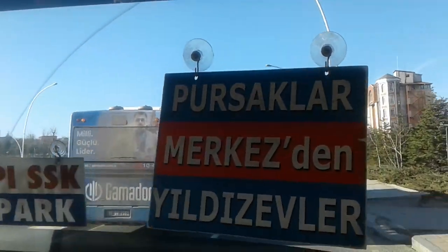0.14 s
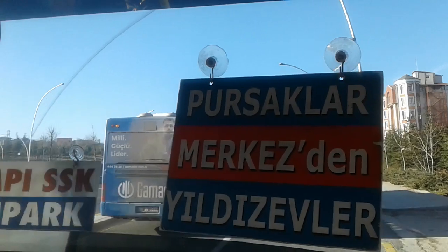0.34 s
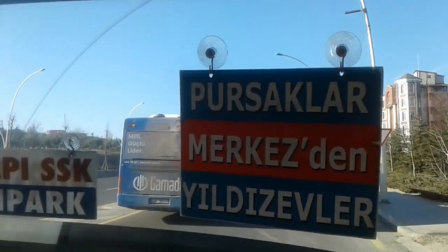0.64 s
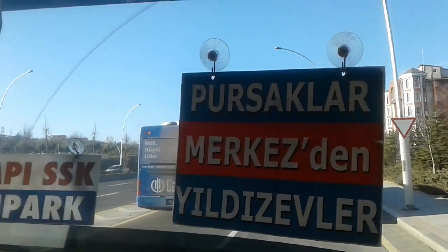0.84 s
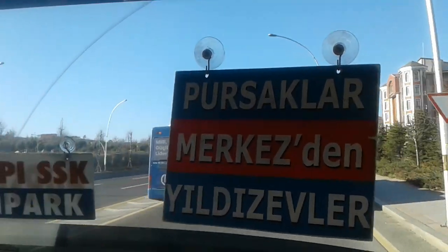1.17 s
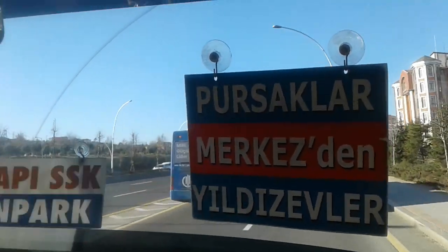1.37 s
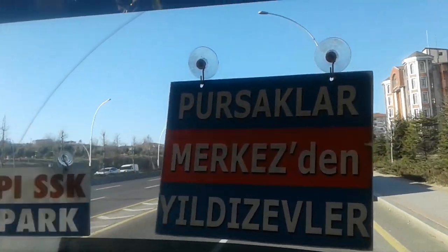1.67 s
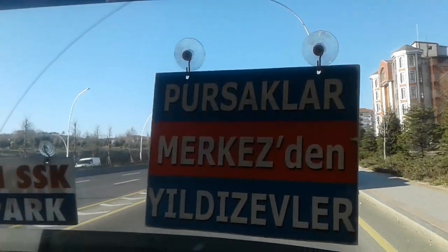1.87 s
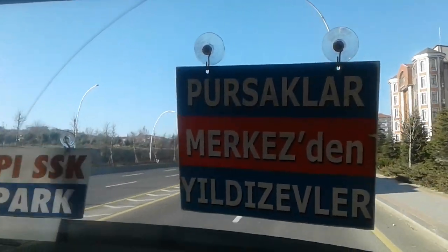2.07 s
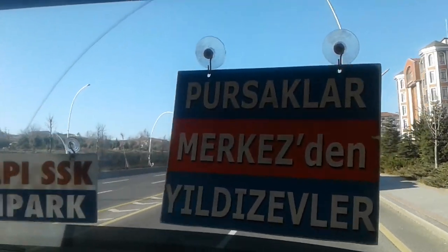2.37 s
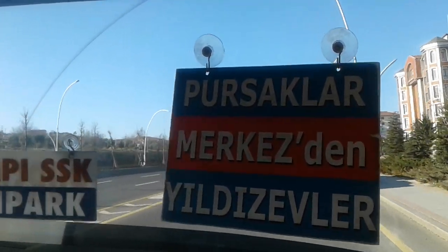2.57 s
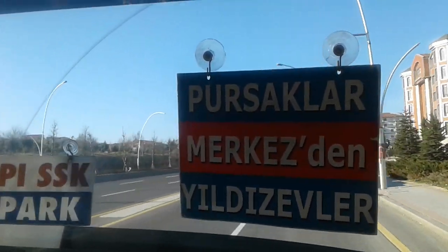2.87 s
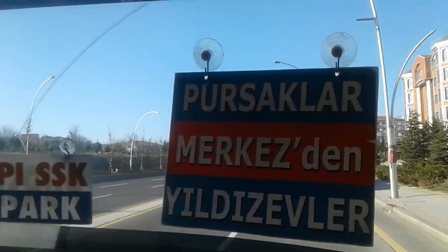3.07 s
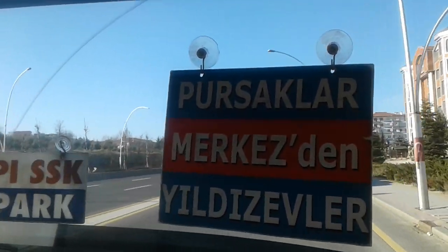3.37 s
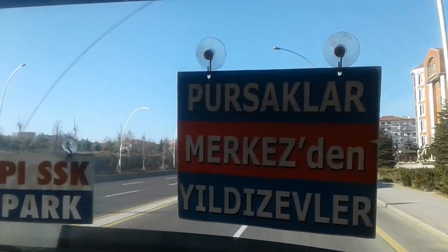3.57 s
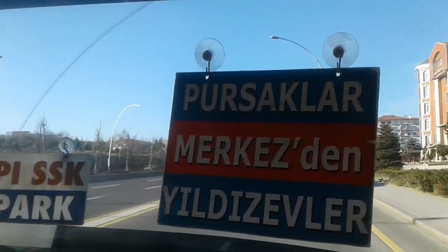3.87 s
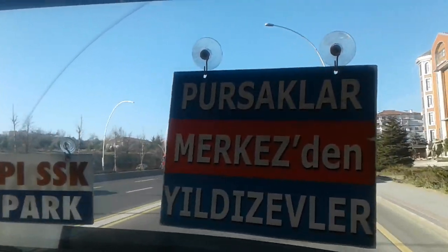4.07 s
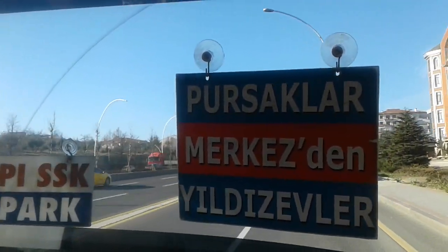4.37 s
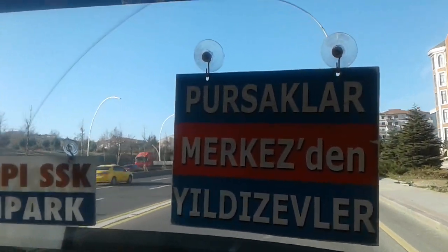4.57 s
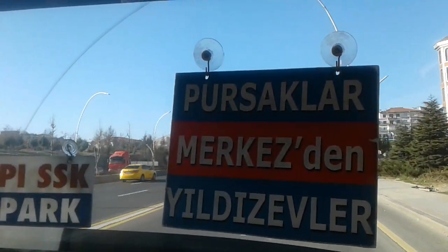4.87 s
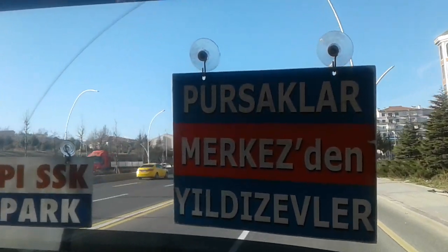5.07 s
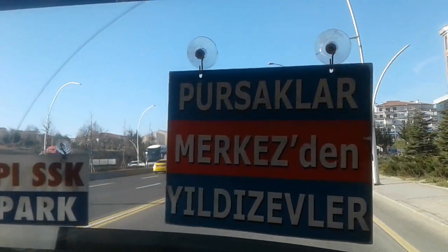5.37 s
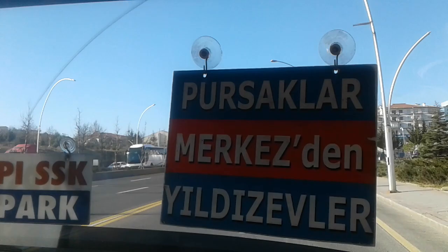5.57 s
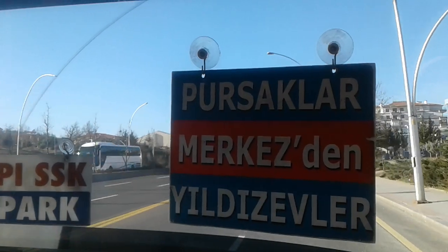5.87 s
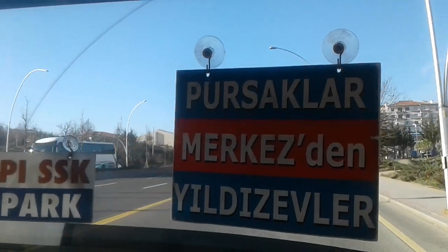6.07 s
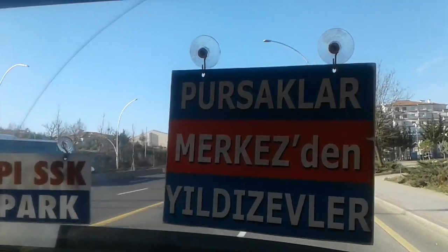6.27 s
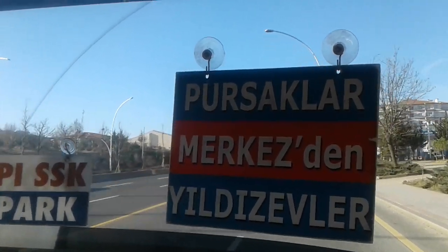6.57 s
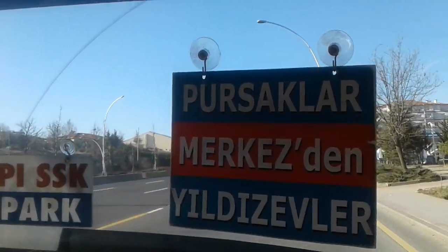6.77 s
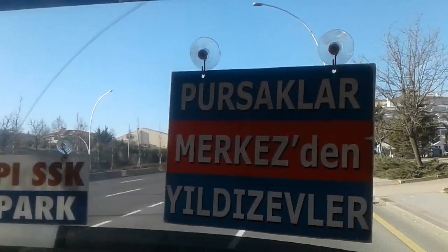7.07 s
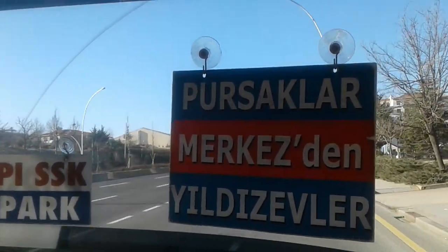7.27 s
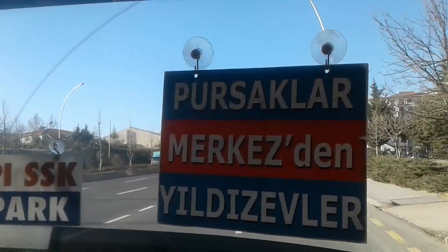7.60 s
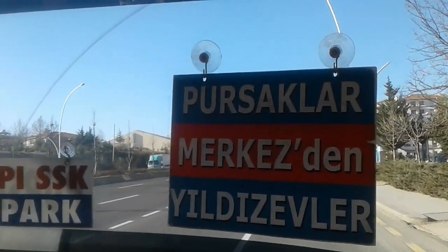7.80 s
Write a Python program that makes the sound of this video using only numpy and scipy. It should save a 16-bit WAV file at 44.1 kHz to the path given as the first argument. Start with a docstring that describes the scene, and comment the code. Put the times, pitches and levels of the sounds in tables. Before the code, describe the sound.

A continuous interior sound of a diesel minibus driving along a city road, about eight seconds. From the start a strong, low, booming hum fills the cab, overlaid by hard, fast, uneven clatter from the engine and a faint mid-high whine. Steady low rumble comes through the floor, with tyre noise and a thin high hiss of air and wind. The pitch creeps up slightly until about 3.6 s, then holds nearly level, and the main boom weakens as it does. Small bright ticks of loose plastic occur near 0.6, 1.2, 1.5, 1.8, 4.3 and 5.5 s; the boom dips very briefly at 1.5 s. Tyre roar swells around 3 s, with smaller bumps at 3.65, 4.4 and 6.5 s. The engine works slightly harder at 2.5 s and from 5.7 to 6.5 s, its clatter and hiss rising, then eases. It is still running at the end.

```python
"""Diesel minibus, inside the cab

A four-cylinder diesel drives along a city road. Cosines at multiples of the firing rate make the cab boom,
less as the engine gathers speed. Its knocks repeat every cycle as a hard clatter (a waveform per cycle)
under fresh noise bursts, with a faint whine. Clatter and a thin air hiss rise with the engine's effort,
over coloured noise for rumble, tyres, rough patches and wind, and noise ticks of loose trim."""
import sys
import numpy as np
from scipy import signal
from scipy.fft import rfft, irfft, next_fast_len
from scipy.io import wavfile
from scipy.ndimage import uniform_filter1d, minimum_filter1d, map_coordinates

SR = 44100
rng = np.random.default_rng(int(sys.argv[2]) if len(sys.argv) > 2 else 0)


def master_out(mix):
    """Clip the mix to full scale and print it as 16-bit PCM to the path in sys.argv[1]."""
    frames = np.transpose(np.atleast_2d(mix))
    ceiling = np.clip(frames, -1, 1)
    pcm = np.round(ceiling * 32767).astype(np.int16)
    wavfile.write(sys.argv[1], SR, pcm)


N = 350154
TIME = np.arange(N) / SR
CYLINDERS = 4
SLOW_HZ, CRUISE_HZ = 69.5, 72.1  # firing rates


def amp(db):
    """Decibels to gain."""
    return 10 ** (np.asarray(db) / 20)


def curve(rows, t=TIME):
    """Table columns, joined by straight lines in time."""
    s, *columns = np.transpose(rows)
    return [np.interp(t, s, column) for column in columns]


def read(points, hz):
    """Spectrum in dB, interpolated on a log-frequency axis."""
    f, db = np.transpose(points)
    return np.interp(np.log(hz + 1), np.log(f), db)


def evened(x):
    """Scale to rms 1."""
    return x / np.sqrt(np.mean(x ** 2) + 1e-20)


def noise(density, gate=1):
    """White noise, gated, then coloured to a density in dB per Hz."""
    size = next_fast_len(N)
    white = gate * rng.standard_normal(N) * np.sqrt(SR / 2)
    gain = amp(read(density, np.fft.rfftfreq(size, 1 / SR)))
    return irfft(rfft(white, size) * gain, size)[:N]


def drift(shape, steps):
    """Slow chance of rms 1 down each column, smoothed by a Gaussian of so many steps."""
    offset = np.arange(shape[0]) - shape[0] // 2
    window = np.exp(-.5 * (offset / steps) ** 2)
    spectrum = rfft(rng.standard_normal(shape), axis=0) * abs(rfft(window))[:, None]
    return evened(irfft(spectrum, shape[0], axis=0))


def waver(count):
    """Smooth chance over the scene, drawn at so many moments."""
    moments = np.linspace(0, TIME[-1], count)
    return np.interp(TIME, moments, drift((count, 1), steps=1)[:, 0])


def hump(s, half_s, db):
    """Smooth rise and fall in dB around one moment."""
    return db * np.exp(-((TIME - s) / half_s) ** 2)


# engine speed before hunting: (t/s, firing rate f/Hz)
FIRING_RATE = [(0.0, 69.23), (0.4, 69.5), (1.4, 70.43), (1.8, 70.16), (2.15, 71.1), (2.45, 70.78),
               (2.7, 71.49), (3.6, 72.09), (4.2, 72.1), (5.45, 72.09), (5.75, 72.48), (6.45, 72.63),
               (7.5, 72.36), (7.94, 72.01)]


def firing_hz(t=TIME):
    """Firing rate, which sets the pitch of every engine order."""
    return curve(FIRING_RATE, t)[0]


def pace(t=TIME):
    """Engine speed from 0 (slow) to 1 (cruising)."""
    return np.clip((firing_hz(t) - SLOW_HZ) / (CRUISE_HZ - SLOW_HZ), 0, 1)


# how hard the engine works; only changes about the mean count: (t/s, level/dB)
EFFORT_LEVEL = [(0, -19), (0.9, -18.5), (1.6, -18.5), (2.5, -17.5), (3.4, -18), (4.1, -18.5), (5.45, -19),
                (5.7, -17), (6.5, -17.5), (7.2, -19), (7.94, -19.5)]


def effort():
    """Engine effort in dB around its mean."""
    db, = curve(EFFORT_LEVEL)
    return db - db.mean()


# body rumble from the road, before rumble_db: (f/Hz, density/dB per Hz)
RUMBLE_DENSITY = [(10, -64.5), (25, -57.5), (40, -56), (62, -54), (94, -42.5), (130, -45.5), (180, -47.5),
                  (255, -44.5), (340, -60), (600, -70.5), (2000, -110), (15000, -140)]


def rumble(rumble_db=0.53):
    """Road vibration through the floor: low coloured noise."""
    return amp(rumble_db) * noise(RUMBLE_DENSITY)


# tyre noise, before level and fade: (f/Hz, density/dB per Hz)
TYRE_DENSITY = [(150, -77), (380, -59.5), (500, -55.5), (680, -60.5), (900, -56.5), (1100, -65.5),
                (2500, -75.5), (5000, -100), (15000, -130)]
# rough road: (centre t/s, half length/s, rise level/dB)
ROUGH_PATCHES = [(2.95, 0.27, 6.5), (3.65, 0.13, 3), (4.388, 0.087, 3.5), (6.49, 0.062, 5)]
TYRE_DB, TYRE_FADE_DB_PER_S = 1, .5  # level at mid-scene


def tyres():
    """Tyre roar: coloured noise, swelling on rough patches and slowly fading."""
    patches_db = sum(hump(*row) for row in ROUGH_PATCHES)
    fade_db = TYRE_FADE_DB_PER_S * (TIME - TIME.mean())
    return amp(TYRE_DB - fade_db + patches_db) * noise(TYRE_DENSITY)


# wind on the body, before level and gusts: (f/Hz, density/dB per Hz)
WIND_DENSITY = [(3500, -78), (4600, -80), (5800, -78), (6700, -79), (7100, -88), (8000, -98), (9100, -98.5),
                (9600, -103), (12500, -99.5), (13500, -103), (14700, -112), (15700, -112)]


def wind(wind_db=0.44, db_per_effort_db=.6, gust_db=0.8):
    """Gusty high noise on the body, rising with effort."""
    db = wind_db + db_per_effort_db * effort() + gust_db * waver(240)
    return amp(db) * noise(WIND_DENSITY)


# loose trim: (t/s, rms level before decay/dB)
TRIM_TICKS = [(0.6464, -47), (1.1777, -37), (1.486, -47), (1.8482, -45), (4.2694, -39), (4.42, -50),
              (4.46, -50), (5.456, -51)]


def trim(decay_s=.0015, count=900):
    """Loose plastic gives short, bright ticks: decaying band noise."""
    out, t = np.zeros(N + count), np.arange(count) / SR
    band = signal.butter(2, [5000, 13000], "bandpass", fs=SR)
    for s, db in TRIM_TICKS:
        tick = evened(signal.lfilter(*band, rng.standard_normal(count))) * np.exp(-t / decay_s)
        out[round(s * SR):][:count] += amp(db) * tick
    return out[:N]


AIR_DB, AIR_HZ = -61.5, 10900  # at mean effort
AIR_DB_PER_EFFORT_DB, AIR_HZ_PER_EFFORT_DB = 2, 260


def air(half_width_hz=520, flutter_db=1):
    """Narrow, fluttering hiss that gets louder and higher as the engine draws more air."""
    push_db = effort()
    band = signal.lfilter(*signal.butter(2, half_width_hz, fs=SR), rng.standard_normal((2, N)))
    angle = 2 * np.pi * np.cumsum(AIR_HZ + AIR_HZ_PER_EFFORT_DB * push_db) / SR
    hiss = evened(band[0] * np.cos(angle) + band[1] * np.sin(angle))
    return amp(AIR_DB + AIR_DB_PER_EFFORT_DB * push_db + flutter_db * waver(300)) * hiss


def cycles(hunt_hz=0.0451):
    """Engine cycles since the start: every cylinder fires once in each; the speed hunts a little."""
    return np.cumsum(firing_hz() + hunt_hz * waver(60)) / CYLINDERS / SR


WHINE_ORDER, WHINE_DB = 28.42, -34.5  # multiple of cycle rate; mid level


def whine(turns, waver_db=2):
    """Belt-driven accessory: a wavering sine at its own ratio to the engine cycle."""
    level = np.sqrt(2) * amp(WHINE_DB + waver_db * waver(40))
    return level * np.sin(2 * np.pi * WHINE_ORDER * turns)


# combustion, injector and valve knocks: (place in cycle 0-1, relative level/dB)
KNOCK_PLACES = [(.05, 0), (.14, -1), (.31, 1), (.42, -6), (.55, -1), (.62, -4), (.80, 0)]


def knocking(place, ring, wash):
    """Envelope over the cycle: each knock dies away into the wash of the engine bay."""
    power = sum(amp(db) ** 2 * np.exp(-((place - at) % 1) / ring) for at, db in KNOCK_PLACES)
    return np.sqrt(evened(power) + abs(wash))


# part of the knocks that differs each time, before level_db: (f/Hz, density/dB per Hz)
RASP_DENSITY = [(200, -70), (500, -61.5), (1100, -58.5), (1400, -59), (1800, -61), (2500, -66),
                (2900, -70.5), (4000, -78.5), (5000, -84), (6600, -84.5), (7800, -106), (15000, -125)]


def rasp(turns, level_db=0.9):
    """No two firings burn alike: fresh noise rides on each knock."""
    gate = evened(knocking(turns % 1, ring=.04, wash=2.2))
    return amp(level_db) * noise(RASP_DENSITY, gate)


# ordinary orders, before lifts and wander: (f/Hz, level per order/dB)
BLOCK_LEVEL = [(20, -46), (45, -47.5), (160, -44.5), (330, -41), (400, -43), (520, -48.5), (700, -43.5),
               (900, -48), (1060, -48.5), (1400, -41.5), (1800, -47.5), (2450, -49), (2750, -55),
               (3200, -58), (4000, -67.5), (6500, -74), (7300, -90.5)]
# outstanding orders, before wander: (multiple of cycle rate, slow level/dB, cruising level/dB)
STRONG_ORDER_LEVEL = [(5, -34, -29), (6, -30, -36), (7, -34, -26), (10, -34, -32), (15, -36, -30),
                      (16, -34, -34), (26, -36, -43), (30, -42, -36), (35, -45, -38), (40, -46, -34),
                      (44, -36, -39), (48, -34, -40), (52, -39, -41), (63, -43, -34), (68, -33, -33),
                      (73, -49, -35), (80, -36, -39), (106, -45, -39)]
BLOCK_DB, FIRING_ORDERS_DB = 0.5, 2.5  # lift of ordinary orders; extra on multiples of the firing rate


def clatter(turns, wander_db=4.0, steady_db=2, blur_rad=0.66, size=16384, count=410):
    """The same knocks ring through the block every cycle: a dense comb of orders."""
    order = np.arange(1, count + 1)
    starts = np.interp(np.arange(int(turns[-1]) + 2), turns, TIME)
    speed = pace(starts)
    order_hz = firing_hz(starts)[:, None] / CYLINDERS * order
    # orders swell and fade as the engine rocks; the strong ones are steadier
    wander = drift((len(starts), count), steps=15)
    db = read(BLOCK_LEVEL, order_hz) + BLOCK_DB + wander_db * wander
    db += FIRING_ORDERS_DB * (order % CYLINDERS == 0)
    for strong, slow_db, cruise_db in STRONG_ORDER_LEVEL:
        k = round(strong) - 1
        db[:, k] = slow_db + (cruise_db - slow_db) * speed + steady_db * wander[:, k]
    # the knocks time the orders
    envelope = knocking(np.arange(size) / size, ring=0.03, wash=0.56)
    blows = rfft(rng.standard_normal(size) * envelope)[order]
    # each band reaches the cab by its own path: accents blur and slowly shift
    paths = np.cumsum(.15 * drift((count, 1), steps=12)[:, 0])
    phase = np.angle(blows) + paths + blur_rad * drift(db.shape, steps=13.4)
    # one waveform per cycle, played at engine speed
    lines = np.pad(amp(db) * np.exp(1j * phase), ((0, 0), (1, 0)))
    waves = irfft(lines, size, axis=1) * size / np.sqrt(2)
    return map_coordinates(waves, [turns, turns % 1 * size], order=1, mode="grid-wrap")


def strokes(turns, uneven_db=0.18, surge_db=0.38):
    """Gain per firing: each a little stronger or weaker than the last, with short surges."""
    firings = turns * CYLINDERS
    count = int(firings[-1]) + 2
    db = uneven_db * rng.standard_normal(count) + surge_db * drift((count, 1), steps=2.2)[:, 0]
    return amp(np.interp(firings, np.arange(count), db))


# cab boom, before waver and node:
# (multiple of firing rate, slow level/dB, cruising level/dB, change/dB per dB of effort)
BOOM_LEVEL = [(1, -19.2, -20, .3), (2, -10.5, -10, -1.3), (3, -22, -20, 1.5), (5, -29.5, -27.5, 1)]
# a standing wave in the cab weakens one multiple towards a firing rate just above cruising
NODE_MULTIPLE, NODE_ABOVE_CRUISE_HZ, NODE_WIDTH_HZ = 2, 0.97, 2.35


def boom(turns, waver_db=-0.37):
    """Firing pulses shake the cab at low multiples of their rate; one fades as it nears a node."""
    speed, push_db, out = pace(), effort(), np.zeros(N)
    node = np.tanh((CRUISE_HZ + NODE_ABOVE_CRUISE_HZ - firing_hz()) / NODE_WIDTH_HZ)
    # higher multiples lag more at low speed, smearing beats into an even hum
    smear = .15 - .05 * speed
    for multiple, slow_db, cruise_db, db_per_effort_db in BOOM_LEVEL:
        k = round(multiple)
        db = slow_db + (cruise_db - slow_db) * speed
        db = db + db_per_effort_db * push_db + waver_db * waver(80)
        wave = np.cos(2 * np.pi * (k * CYLINDERS * turns - smear * k * k))
        out += amp(db) * wave * (node if k == NODE_MULTIPLE else 1)
    # the level dips briefly
    return np.sqrt(2) * amp(hump(s=1.51, half_s=.03, db=-3)) * out


def scene():
    """Road, wind, trim, air and engine together in the cab."""
    background = rumble() + tyres() + wind() + trim() + air()
    turns = cycles()
    knocks = amp(effort()) * strokes(turns) * (clatter(turns) + rasp(turns))
    return (background + whine(turns) + knocks + boom(turns))[None]


def record(dry, size=441, ceiling=.9, edge_hz=15750):
    """A quick limiter eases the highest peaks; then a low-pass limits the band."""
    gain = minimum_filter1d(ceiling / np.maximum(abs(dry), ceiling), 2 * size)
    held = dry * uniform_filter1d(uniform_filter1d(gain, size), size)
    lowpass = signal.firwin(511, edge_hz, window=("kaiser", 9), fs=SR)
    return signal.oaconvolve(held, lowpass[None], "same")


dry = scene()
out = record(dry)
master_out(out)
```